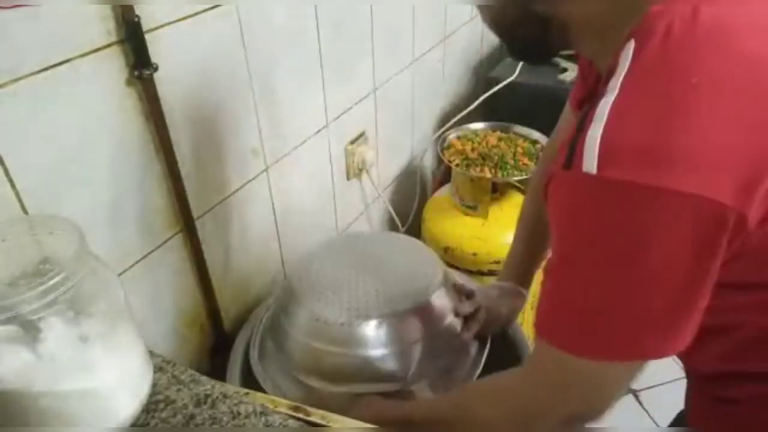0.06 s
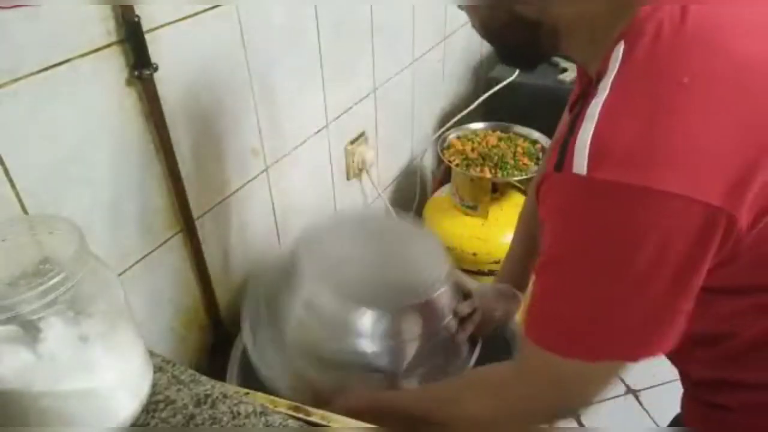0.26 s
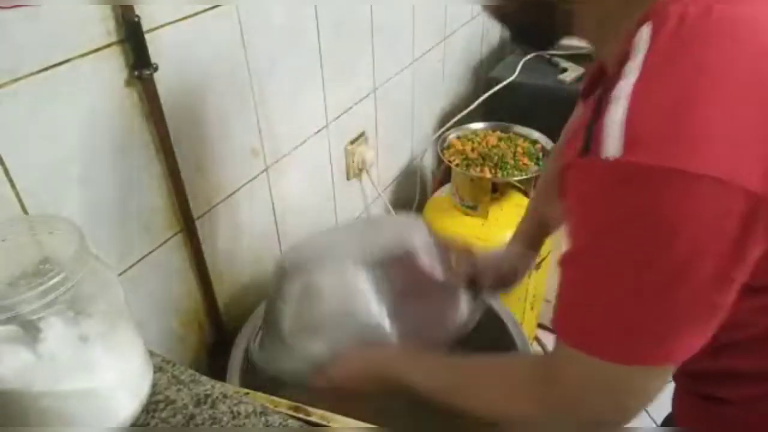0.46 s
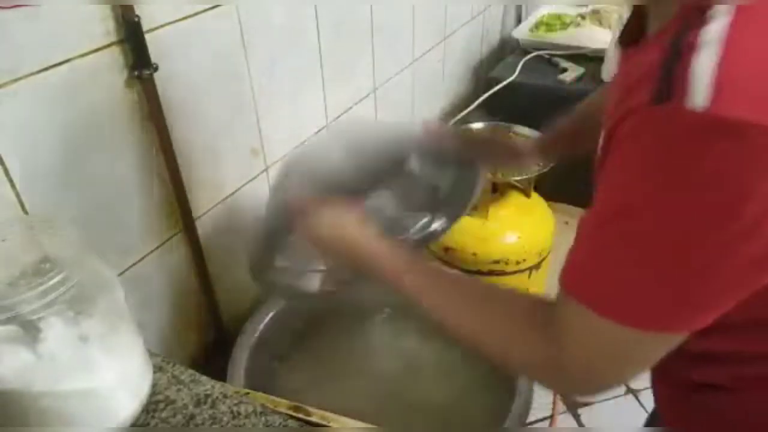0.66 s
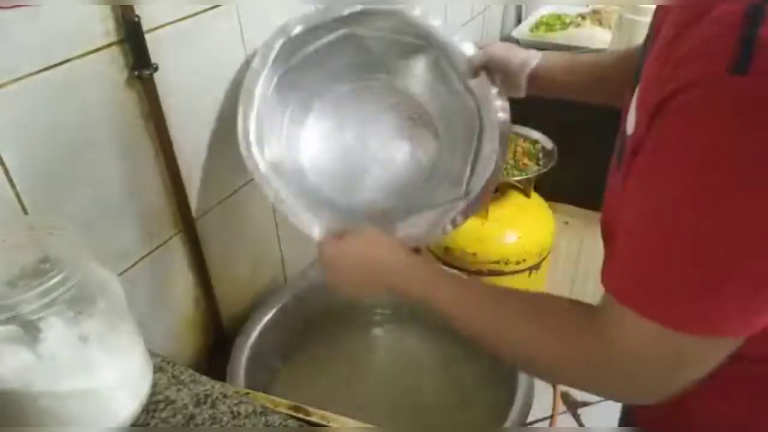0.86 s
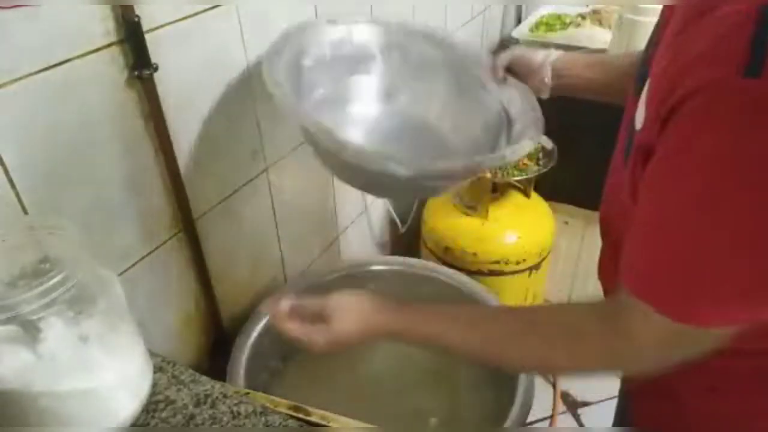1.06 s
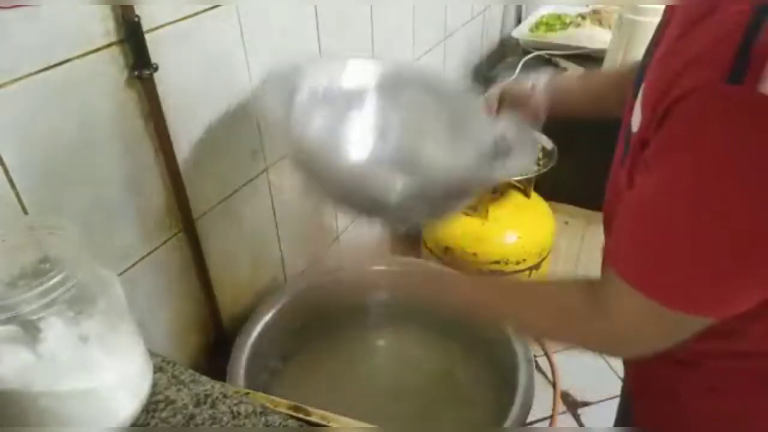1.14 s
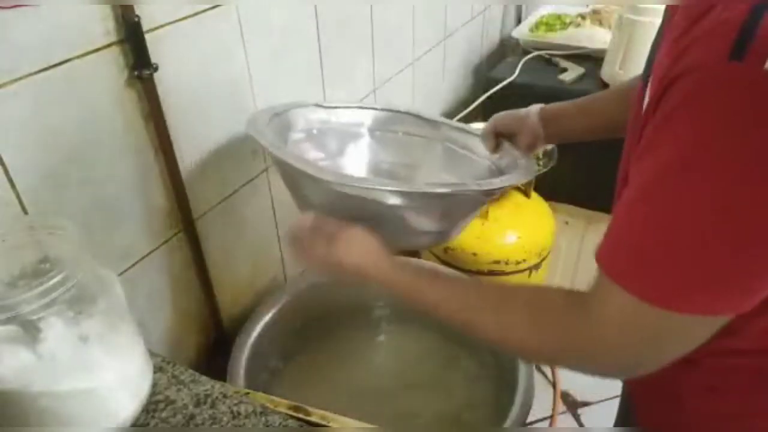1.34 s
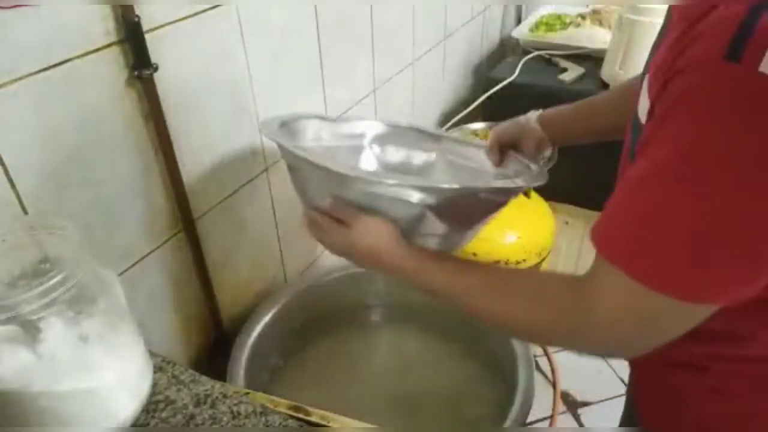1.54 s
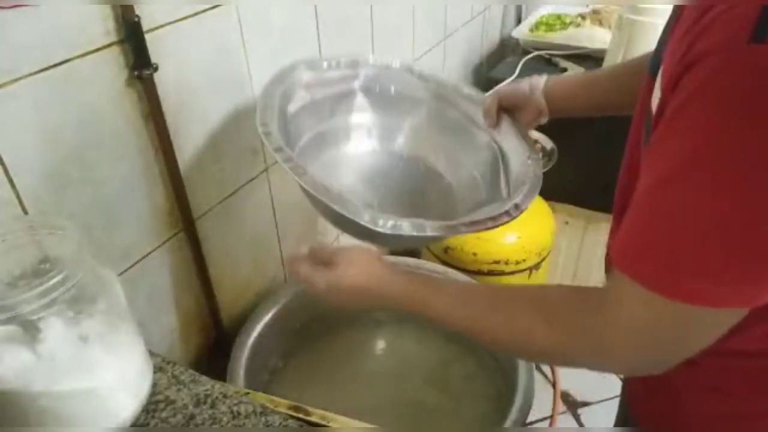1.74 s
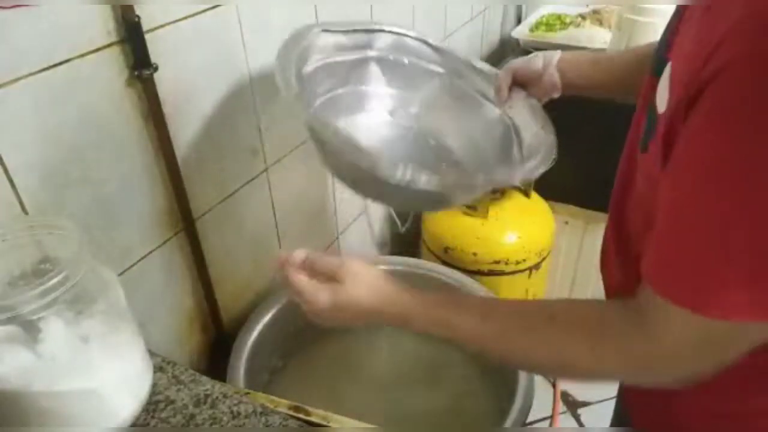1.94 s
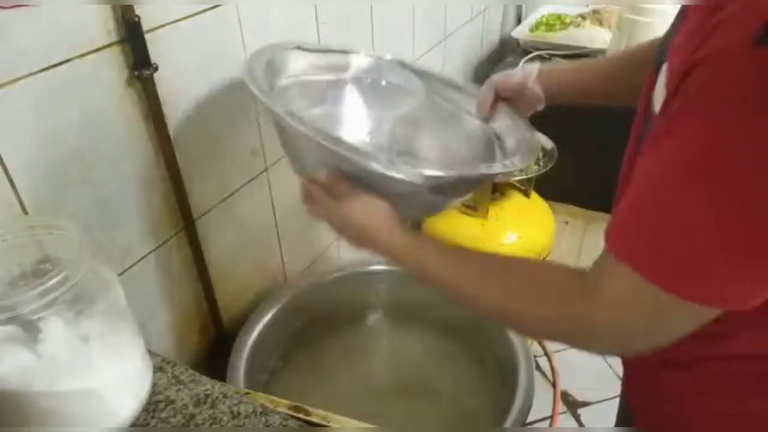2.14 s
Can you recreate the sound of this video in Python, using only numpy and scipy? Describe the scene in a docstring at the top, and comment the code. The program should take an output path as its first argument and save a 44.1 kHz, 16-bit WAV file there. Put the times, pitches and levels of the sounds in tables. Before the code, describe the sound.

Ringing metal clangs, two knocks and two hand slaps on a steel strainer, with low humming.

```python
"""In a small tiled kitchen, an upturned steel strainer is knocked twice on the rim of a large pot,
then lifted and slapped twice by hand. Each blow makes the thin metal clang at many pitches of its own,
called modes, and wakes a low boom in the room. The metal hisses softly as it slides or the hand rubs it.
A motor hums throughout, and a limiter (a fast volume control) flattens the start of each blow."""
import sys
import numpy as np
from scipy import signal
from scipy.fft import rfft, irfft
from scipy.io import wavfile
from scipy.ndimage import uniform_filter1d

SR = 44100
rng = np.random.default_rng(int(sys.argv[2]) if len(sys.argv) > 2 else 0)


def output_pcm(signal):
    """Save a mono or channel-first signal as 16-bit PCM at the path in sys.argv[1].

    Samples are clipped to [-1, 1] before scaling.
    """
    pcm = np.clip(np.atleast_2d(signal).T, -1, 1) * 32767
    wavfile.write(sys.argv[1], SR, np.round(pcm).astype(np.int16))


N = 99225
T = np.arange(N) / SR
HZ = np.maximum(np.arange(N // 2 + 1) * SR / N, 1)

# Levels are relative. A fade time (t60) is the time a sound takes to fall by 60 dB.
# how alike left and right are: (frequency [Hz], likeness [-1 to 1])
STEREO_LIKENESS = [(40, 0.16), (80, 1), (250, .88), (500, 0.59), (1000, -0.22), (4000, 0.098),
                   (12000, -0.099)]
# the motor's tones: (multiple of the hum's pitch [x], level [dB])
MOTOR_TONES = [(1, -32), (2, -48), (3, -50), (4, -50.5), (18, -54), (20, -61.5), (27, -61)]
# wavering of the lowest motor tone: (time [s], level [dB])
LOW_TONE_WAVER = [(0, 2.5), (.09, -11.5), (.2, -1.5), (.45, -9), (.95, 3), (1.07, -7), (1.22, -0.5),
                  (1.34, 0), (1.42, -8.5), (1.7, -0.5), (2.05, -3.5), (2.2, 1.5)]
# the motor's thin whine: (time [s], level [dB])
WHINE_CURVE = [(0, -53), (.1, -51), (.19, -33), (.28, -41.5), (.55, -43), (.9, -56), (1.05, -49),
               (1.35, -47.5), (1.45, -53), (2.05, -45), (2.25, -46)]
# rise and fall of hum and room noise together: (time [s], level [dB])
BACKGROUND_CURVE = [(0, 9), (.25, 12), (.55, 3), (.85, -6), (1.05, -1), (1.3, -1), (1.45, -1.5),
                    (1.75, -3.5), (2.05, 0.5), (2.25, 3)]
# tone colour of the room noise: (frequency [Hz], level [dB])
ROOM_COLOUR = [(25, -14), (90, 10.5), (140, -1), (250, -4.5), (450, -6), (850, -12), (1110, 1),
               (1400, -12.5), (1780, -3), (2300, -11.5), (4000, -15), (6700, -20.5), (8000, -29),
               (13000, -28.5)]
# slides and rubs on the metal: (peak time [s], level [dB], rise time [s], fade time [s])
RUB_STROKES = [(0.0, -27.5, .02, 0.67), (1.765, -31, 0.058, 0.37), (1.83, -32, 0.025, 0.58),
               (2.08, -30, 0.11, 0.4)]
# tone colour of the rubbing and of each blow's crack: (frequency [Hz], level [dB])
CONTACT_COLOUR = [(200, -8), (600, -7), (1300, -0.5), (2500, -4.5), (4500, -5), (6700, 0), (7900, -13.5),
                  (10500, -9), (13000, -15)]
# how long the crowd of weaker modes rings: (frequency [Hz], fade time [s])
CROWD_FADE = [(60, 0.51), (400, 0.5), (1200, 0.49), (3000, 0.5), (6000, 0.49), (12000, 0.41)]
# tone colour of that crowd in a knock: (frequency [Hz], level [dB])
KNOCK_CROWD_COLOUR = [(35, -15), (70, 1), (170, -3), (260, 5.5), (430, 0), (750, 0.5), (950, -1.5),
                      (1250, 4), (1500, -3.5), (2400, -2.5), (4200, -11), (6700, -10.5), (7900, -24),
                      (10500, -22), (13000, -27.5)]
# tone colour of that crowd in a slap: (frequency [Hz], level [dB])
SLAP_CROWD_COLOUR = [(35, -12), (70, 2.5), (170, -6), (330, -7), (520, 0.5), (850, 0.5), (1300, 1),
                     (1650, -4.5), (2700, 1), (3800, -8), (5200, -10), (6700, -5), (7900, -24),
                     (10500, -17.5), (13000, -24.5)]
# strong modes of strainer against pot: (pitch [Hz], fade time [s], first knock [dB], second knock [dB])
KNOCK_MODES = [(136, .4, -11, -13.5), (214.1, 0.22, -1, -1), (245.8, 0.5, -8, -9.5),
               (304.3, 0.54, -14, -11.5), (378, 0.23, -12, -17), (441.5, 0.67, -32, -20),
               (587, 0.69, -23.5, -32), (655, 0.36, -32, -23), (718, 0.49, -23, -18),
               (731, 0.59, -15, -16.5), (787, 0.25, -12, -37), (845, 0.23, -21, -17),
               (1119, 0.42, -8.5, -12.5), (1181, 0.48, -9, -10.5), (1236, 0.34, -11, -26),
               (1405, .35, -32, -40), (1663, 0.57, -20, -17.5), (1681, 0.5, -19, -15),
               (1982, 0.52, -20.5, -21), (2102, 0.5, -20, -16), (2695, 0.5, -28, -18.5),
               (3010, 0.6, -40, -22), (3276, 0.43, -39, -17.5), (5530, 0.28, -41, -36)]
# strong modes of the lifted strainer: (pitch [Hz], fade time [s], first slap [dB], second slap [dB])
SLAP_MODES = [(107.4, 0.52, -36, -6), (132, 0.53, -35, -23), (152, 0.35, -35, -10.5),
              (279.7, 0.34, -12, -17), (449.5, .45, -21, -11.5), (506.4, 0.49, -18, -9),
              (589, 0.53, -24, -11), (616, 0.43, -9, -12.5), (720, 0.2, -38, -7), (880, 0.36, -19, -9),
              (1107, 0.25, -3, -26), (1164, 0.67, -16, -23), (1285, 0.85, -33, -25), (1370, 0.55, -15, -51),
              (1960, 0.57, -15, -20), (2135, 0.4, -11.5, -27), (2316, 0.59, -22, -15),
              (2550, 0.78, -16, -30), (2560, 0.54, -12.5, -40), (2710, 0.39, -19, -45),
              (2790, 0.45, -10, -34), (3040, 0.55, -15.5, -37), (3100, 0.37, -11.5, -23),
              (3689, 0.28, -23, -40), (4250, .42, -34, -43), (6400, 0.41, -37, -16), (6440, 0.66, -32, -22)]
# knocks on the pot: (time [s], clang [dB], brightness [dB/octave], crack [dB], thud [dB], boom [dB])
RIM_KNOCKS = [(0.2842, -5.5, -0.9, -1, -2, -19), (0.6132, -4.5, -0.14, -13.5, -9, -17.5)]
# slaps by hand: (time [s], clang [dB], brightness [dB/octave], crack [dB], thud [dB], boom [dB])
HAND_SLAPS = [(1.5322, -4.5, -0.48, -15, -37, -18.5), (1.8392, -6, -0.33, -5, -12.5, -12.5)]

HUM_HZ, WHINE_MULTIPLE = 96.9, 11
MODE_GAP_HZ, TREBLE_FROM_HZ = 69.83, 3300  # spacing of the crowded modes, and where they begin
CONTACT_S = 0.00088  # the force of a blow builds up
BOOM_HZ, BOOM_T60_S, BOOM_RISE_S = 77.8, 0.85, 0.018  # a low note of the room


def from_db(db):
    """Turn decibels into a number to multiply by."""
    return 10 ** (np.asarray(db) / 20)


def rms_one(x):
    """Scale a signal to an average strength (rms) of 1."""
    return x / np.sqrt(np.mean(x ** 2) + 1e-20)


def at_hz(points, hz):
    """Read a table between its frequencies, with every octave equally wide."""
    freqs, values = np.transpose(points)
    return np.interp(np.log(hz), np.log(freqs), values)


def level_curve(points):
    """Join (time, level) points into a volume curve."""
    return from_db(np.interp(T, *np.transpose(points)))


def decay(t60, hold_s=0):
    """A volume curve that holds, then falls 60 dB in t60 seconds."""
    return from_db(-60 * np.maximum(T - hold_s, 0) / t60)


def rise(seconds):
    """A volume curve that swells from 0 towards 1."""
    return 1 - np.exp(-T / seconds)


def delayed(x, start_s):
    """Start a stereo sound later."""
    return np.pad(x, ((0, 0), (int(start_s * SR), 0)))[:, :N]


def drift(rate_hz):
    """A slow random wobble, about 1 in size."""
    return noise(rfft(rng.standard_normal(N)) / (1 + (HZ / rate_hz) ** 2))


def stereo_spectrum(colour):
    """A random mix of frequencies, with left and right alike in the bass and wide in the treble."""
    mid, side = rfft(rng.standard_normal((2, N)))
    alike = at_hz(STEREO_LIKENESS, HZ)
    pair = np.sqrt(1 + alike) * mid + np.sqrt(1 - alike) * side * np.array([[1], [-1]])
    return from_db(at_hz(colour, HZ)) * pair


def noise(spectrum):
    """Turn a mix of frequencies into a signal of strength 1."""
    return rms_one(irfft(spectrum, N))


def tone(hz):
    """A pure tone that reaches left and right out of step."""
    apart = np.arccos(at_hz(STEREO_LIKENESS, hz)) * rng.choice([-1, 1])
    return np.sin(2 * np.pi * (hz * T + rng.random()) + apart * np.array([[.5], [-.5]]))


def motor_hum(waver_db=1.25):
    """A motor's wavering tones and thin whine over soft room noise."""
    lowest, *upper = [from_db(db + waver_db * drift(6)) * tone(k * HUM_HZ) for k, db in MOTOR_TONES]
    hum = lowest * level_curve(LOW_TONE_WAVER) + sum(upper)
    whine = level_curve(WHINE_CURVE) * from_db(waver_db * drift(23)) * tone(WHINE_MULTIPLE * HUM_HZ)
    room = from_db(-43.5) * noise(stereo_spectrum(ROOM_COLOUR))
    return whine + level_curve(BACKGROUND_CURVE) * (hum + room)


def mode_crowd(wash_db=5.5):
    """Weights that make the metal's close-packed treble modes stand out of the room's even wash."""
    gap_bins = MODE_GAP_HZ * N / SR
    places = (np.cumsum(.5 + rng.random(1000)) * gap_bins).astype(int)
    peaks = np.zeros(len(HZ))
    peaks[places[places < len(HZ)]] = np.sqrt(gap_bins)
    return np.hypot(np.where(HZ > TREBLE_FROM_HZ, peaks, .7), from_db(wash_db))


def mode_groups(width_hz=130, spread_db=4.5):
    """Each contact favours some groups of neighbouring modes, most of all in the treble."""
    depth_db = spread_db * np.minimum(HZ / TREBLE_FROM_HZ, 1)
    favour = np.clip(rng.standard_normal(1000), -2, 1)
    return from_db(depth_db * np.interp(HZ / width_hz, np.arange(1000), favour))


def rubbing(crowd):
    """Friction makes the metal hiss in swells; the last rub sets one mode singing."""
    power = 0
    for peak_s, db, rise_s, t60 in RUB_STROKES:
        drop_db = np.where(T < peak_s, 9 * ((peak_s - T) / rise_s) ** 2, 60 * (T - peak_s) / t60)
        power += from_db(db - drop_db) ** 2
    hiss = np.sqrt(power) * noise(stereo_spectrum(CONTACT_COLOUR) * crowd * mode_groups())
    flicker = from_db(0.77 * drift(33))
    ring = from_db(-27.5) * tone(hz=1307) * rise(0.022) * decay(t60=0.49)
    return hiss * flicker + delayed(ring, start_s=2.03)


def light_tap():
    """A light, damped touch of metal before the first knock."""
    ping = tone(hz=593) * decay(t60=0.098)
    click = 1.4 * noise(stereo_spectrum(KNOCK_CROWD_COLOUR)) * decay(t60=0.06)
    return from_db(-27) * delayed(ping + click, start_s=.076)


def hollow_note(swell_s=.05):
    """The pot's hollow note swells after each knock and dies quickly."""
    shape = np.minimum(T / swell_s, 1) ** 2 * decay(t60=0.2, hold_s=swell_s)
    return from_db(-6.5) * sum(delayed(shape * tone(hz=276.4), start_s) for start_s, *_ in RIM_KNOCKS)


def clang(spectrum, hold_s):
    """The crowd of weaker modes dies away, each octave at its own rate."""
    edges = np.concatenate([[0], np.geomspace(SR / 256, SR / 2, 8)])
    bands = [irfft(spectrum * (HZ > low) * (HZ <= high), N) for low, high in zip(edges, edges[1:])]
    fade_times = at_hz(CROWD_FADE, edges[1:] / np.sqrt(2))
    return sum(band * decay(t60, hold_s) for band, t60 in zip(bands, fade_times)) / sum(bands).std()


def blows(events, modes, colour, crowd, modes_db, swell_cycles, ring_hold_s, sheet_hold_s,
          clash_db, clash_t60, crack_t60, thud_hz, thud_t60):
    """Each blow cracks and thuds, sets the steel ringing and makes the room boom."""
    out = 0
    for k, (start_s, clang_db, brightness, crack_db, thud_db, boom_db) in enumerate(events):
        tilt = from_db(brightness * np.log2(HZ / 1000))
        sheet = clang(stereo_spectrum(colour) * crowd * mode_groups() * tilt, sheet_hold_s)
        sheet *= 1 + from_db(clash_db) * decay(clash_t60)  # a short clash at the start
        ring = 0
        for hz, t60, *levels_db in modes:
            shape = rise(swell_cycles / hz) * decay(t60, ring_hold_s)  # low modes swell more slowly
            ring += from_db(levels_db[k] + modes_db) * tone(hz) * shape
        steel = from_db(clang_db) * (sheet * from_db(-3) + ring) * rise(CONTACT_S)
        crack = from_db(crack_db) * noise(stereo_spectrum(CONTACT_COLOUR)) * decay(crack_t60)
        thud = from_db(thud_db) * np.sin(2 * np.pi * thud_hz * T) * decay(thud_t60) * rise(CONTACT_S)
        boom = from_db(boom_db) * tone(BOOM_HZ) * decay(BOOM_T60_S) * rise(BOOM_RISE_S)
        out += delayed(steel + crack + thud + boom, start_s)
    return out


def knocks(crowd):
    """The strainer hits the pot's rim with a short crack, and both ring."""
    return blows(RIM_KNOCKS, KNOCK_MODES, KNOCK_CROWD_COLOUR, crowd,
                 modes_db=-1, swell_cycles=3.4, ring_hold_s=0.023, sheet_hold_s=0.029,
                 clash_db=3, clash_t60=0.022, crack_t60=0.011, thud_hz=197, thud_t60=.1)


def slaps(crowd):
    """A hand hits the lifted strainer with a longer crack and a deeper thud."""
    return blows(HAND_SLAPS, SLAP_MODES, SLAP_CROWD_COLOUR, crowd,
                 modes_db=-2.5, swell_cycles=4.2, ring_hold_s=0.0074, sheet_hold_s=0.0087,
                 clash_db=-6, clash_t60=0.065, crack_t60=0.087, thud_hz=134, thud_t60=0.17)


def scene():
    """Knocks, slaps and rubbing over the motor's hum."""
    crowd = mode_crowd()
    return hollow_note() + knocks(crowd) + slaps(crowd) + light_tap() + rubbing(crowd) + motor_hum()


def record(dry):
    """A fast limiter holds the blows down, the peaks are rounded and the highest treble is cut."""
    ceiling, attack_s, release_db_per_s, cutoff_hz = 1.93, 0.0014, 151, 13100
    over_db = 20 * np.log10(np.maximum(np.abs(dry).max(0) / ceiling, 1))
    recovery_db = release_db_per_s * T
    cut_db = np.maximum.accumulate(over_db + recovery_db) - recovery_db  # eases off after each peak
    limited = dry * from_db(-uniform_filter1d(cut_db, int(attack_s * SR)))
    rounded = limited / (1 + limited ** 8) ** (1 / 8)
    return signal.sosfilt(signal.ellip(10, .2, 70, cutoff_hz, fs=SR, output="sos"), rounded)


dry = scene()
out = record(dry)
output_pcm(out)
```